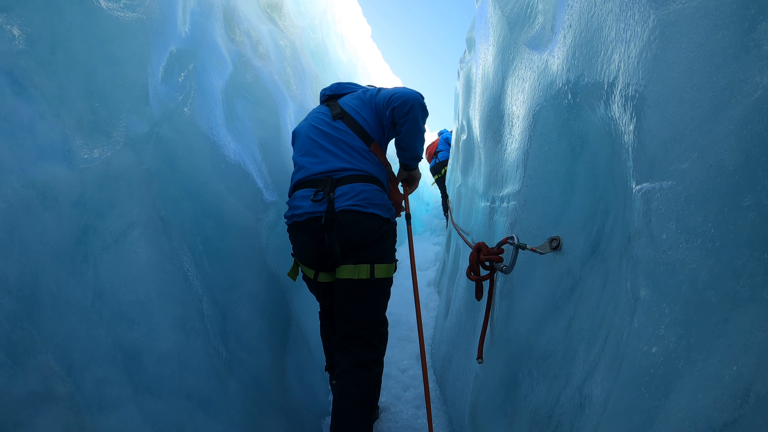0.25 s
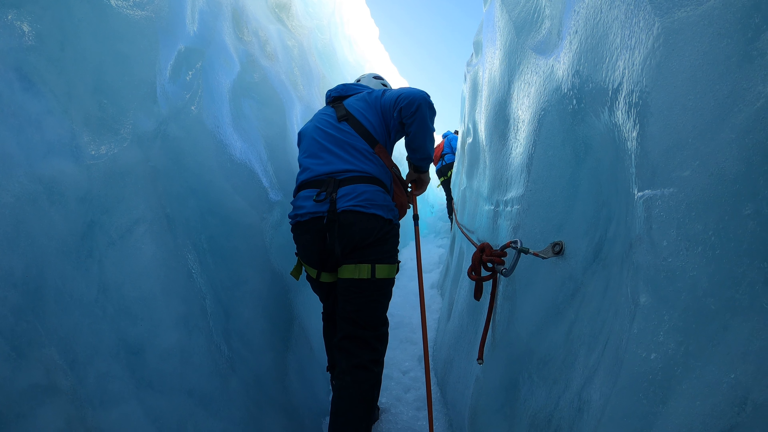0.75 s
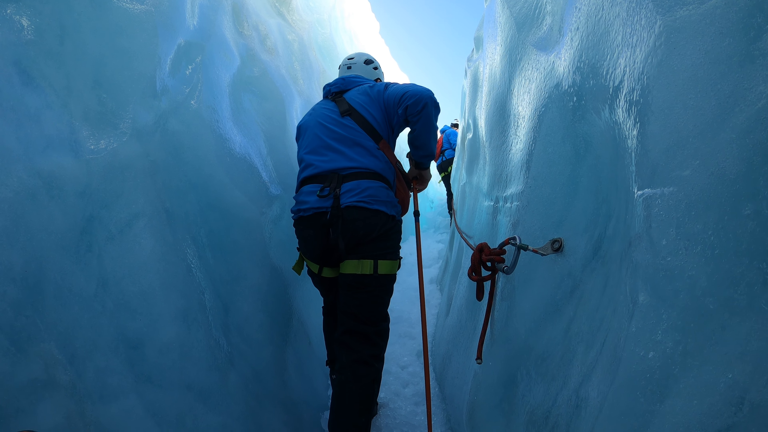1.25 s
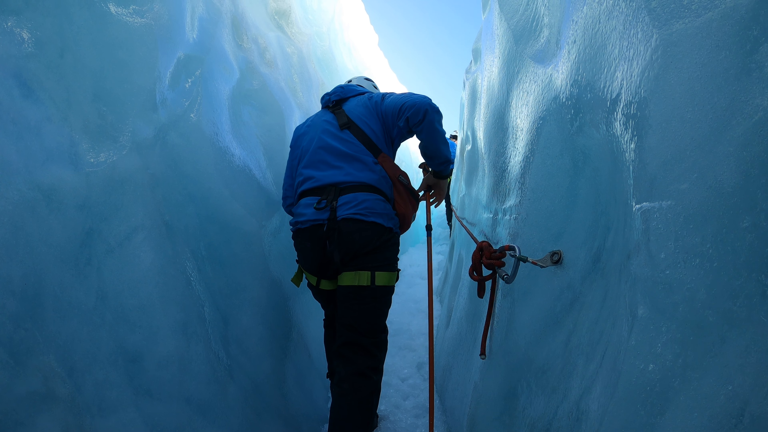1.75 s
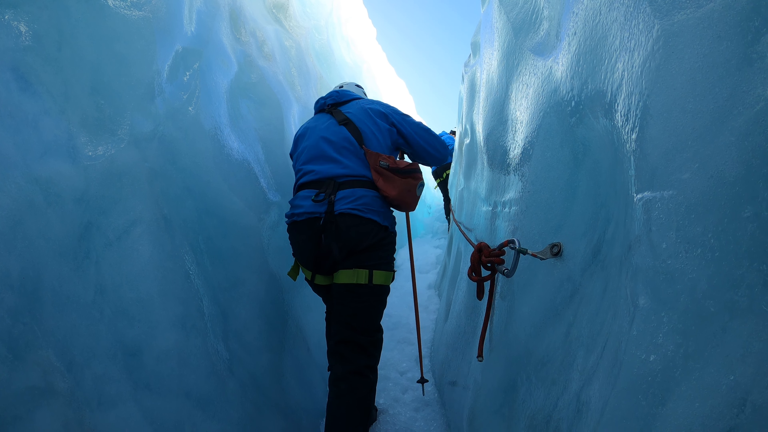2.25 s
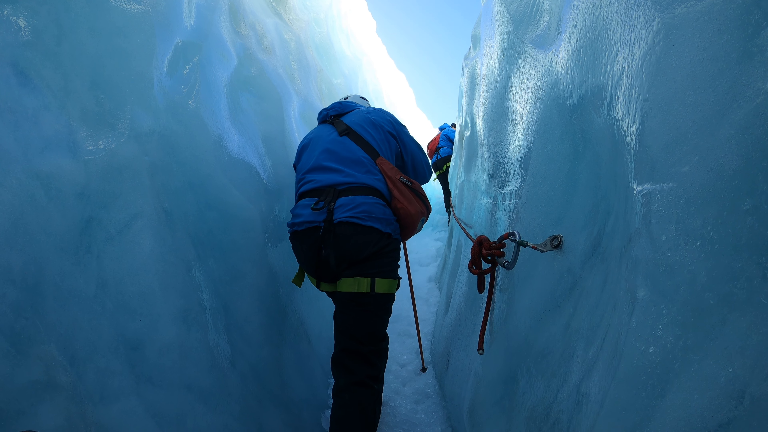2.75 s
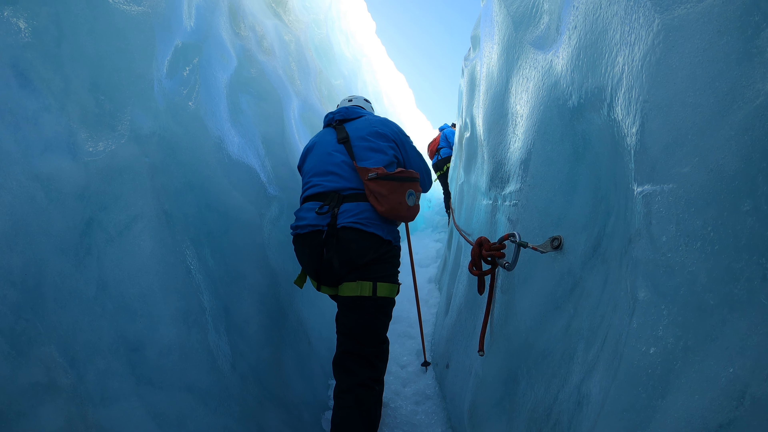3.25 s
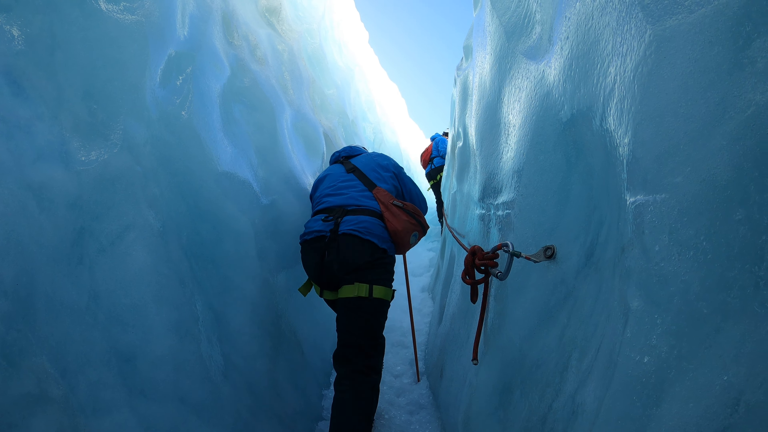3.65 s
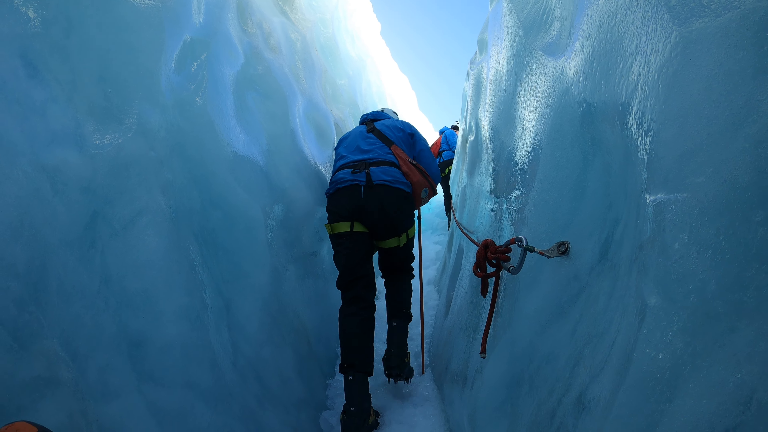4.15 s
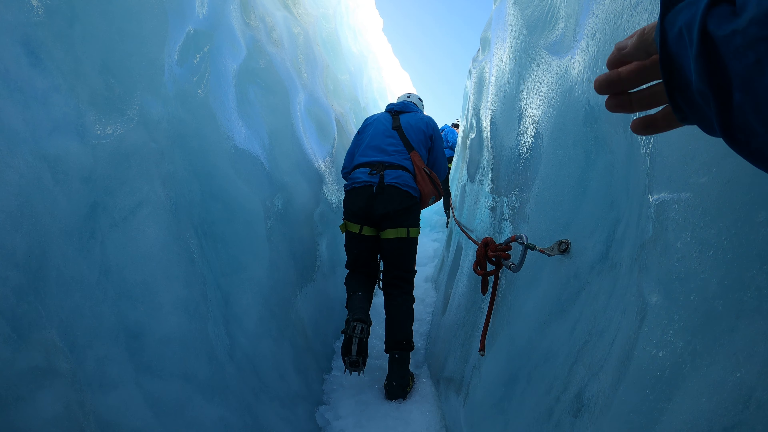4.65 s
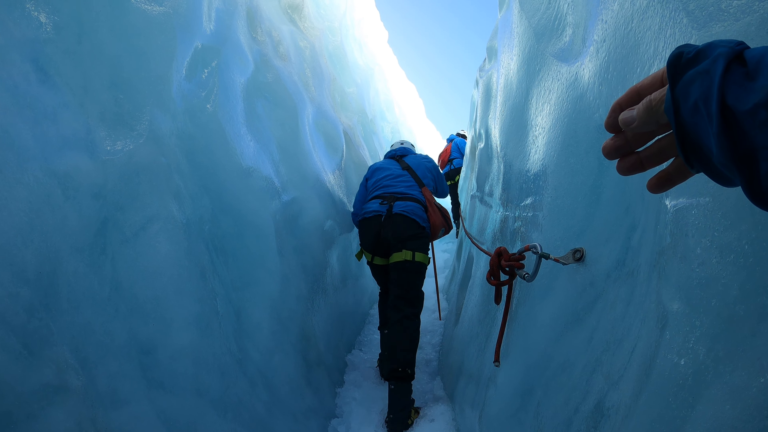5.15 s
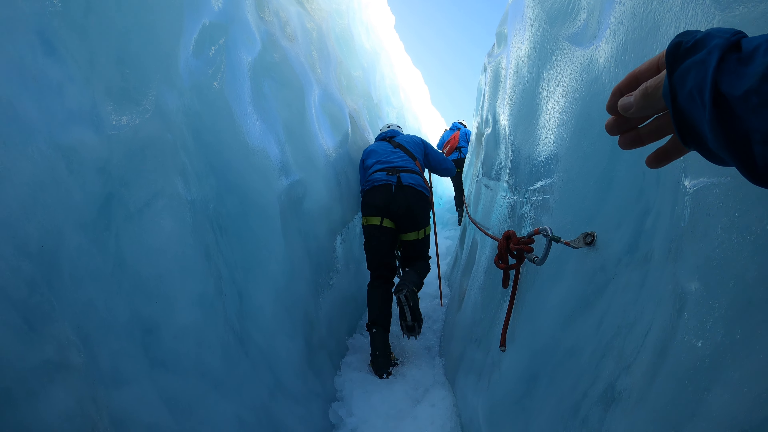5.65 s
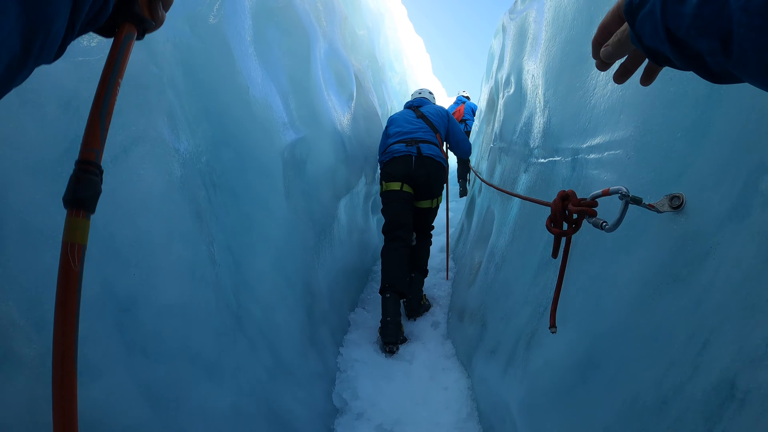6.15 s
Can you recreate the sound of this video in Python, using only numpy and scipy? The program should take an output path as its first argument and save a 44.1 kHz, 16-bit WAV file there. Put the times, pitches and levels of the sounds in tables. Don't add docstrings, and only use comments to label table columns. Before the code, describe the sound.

In a narrow ice passage, a chest-worn microphone first picks up low thumps, fabric rub and a few tiny metal ticks over near silence. A short burst of gritty crunching comes at about two and a half seconds, then a lull with loose chips. From three and a half seconds spiked boots crunch heavily and unevenly, with sharp bites into hard ice, trickling grains, jacket rub and strap rumble to the end.

```python
import sys
import numpy as np
from scipy import signal
from scipy.fft import rfft, irfft, next_fast_len
from scipy.io import wavfile
from scipy.ndimage import uniform_filter1d

SR = 44100
rng = np.random.default_rng(int(sys.argv[2]) if len(sys.argv) > 2 else 0)


def transcribe(u):
    v = np.clip(np.atleast_2d(u).T, -1, 1)
    q = np.round(v * 32767).astype(np.int16)
    wavfile.write(sys.argv[1], SR, q)


def gain_from_decibels(decibels):
    exponent = np.asarray(decibels, float) / 20
    return 10 ** exponent


N = 282328
TIME = np.arange(N) / SR
CONTROL = TIME[::44]
FREQ = np.fft.rfftfreq(next_fast_len(N + SR // 2, True), 1 / SR)
PAD = 2 * len(FREQ) - 2

# [t/s, level/dB, fall by 20 dB/s, brightness/dB]
LANDINGS = [(0.011, -53.5, 0.18, -9.5), (0.53, -59.5, 0.5, -14.5), (1.74, -61, 0.6, -7),
            (2.25, -56.5, 11, -9), (2.357, -40, 0.25, -2), (2.445, -33.5, 0.14, -10.5),
            (2.497, -31.5, 0.1849, -6), (1.39, -51.5, 0.35, -16), (2.76, -58, 0.34, -2.5),
            (3.08, -53.5, 0.24, -34), (3.374, -48, 0.2, -15), (3.442, -30.5, 0.05, -8.5),
            (3.537, -46, 0.04, -7.5), (3.666, -32, 0.06, -7), (3.859, -35.5, 0.1, -7.5),
            (4.08, -42.5, 0.29, -5.5), (4.371, -37, 0.28, -8), (4.44, -37.5, 0.03, -10.5),
            (4.561, -36.5, 0.11, -10), (5.052, -34.5, 0.27, -14), (5.113, -39, 0.48, -4.5),
            (5.547, -31.5, 0.17, -11.5), (5.655, -34, 0.18, -9.5), (5.759, -40, 0.62, -9),
            (6.062, -29.5, 0.06, -8), (6.11, -39.5, 0.22, -6.5), (6.347, -29, -0.12, -8.5),
            (3.451, -37, 0.02, -3), (3.755, -44, 0, -2.5), (3.79, -37.5, 0.02, -6.5), (6.36, -35, -1, -4.5)]
# [end t/s, level/dB, swell/s, brightness/dB]
SCRAPES = [(0.379, -64, 0.14, -4.5), (1.94, -64.5, 0.053, 0), (2.05, -58, 0.17, -7.5),
           (1.571, -48, 0.34, -16.5), (1.699, -47.5, 0.34, -10.5), (2.482, -29, 0.12, -8),
           (2.581, -37, 0.31, -13.5), (2.727, -35.5, 0.09, -9.5), (2.909, -51.5, 0.091, -7.5),
           (3.44, -42, 0.031, -4), (3.66, -37.5, 0.034, -11), (3.78, -36.5, 0.11, -9.5),
           (3.85, -30.5, 0.1, -9.5), (4.08, -38.5, 0.25, -7), (4.37, -44, 0.093, -4), (4.63, -41, .04, -19),
           (5.007, -33.5, 0.39, -9.5), (5.059, -35, 0.067, -10), (5.175, -30.5, 0.26, -11.5),
           (5.643, -30.5, 0.15, -10), (6.055, -43, 0.033, -1), (5.15, -41, .04, -2.5),
           (6.097, -34.5, 0.055, -9.5), (4.505, -47.5, 0.067, -11), (5.98, -50.5, .2, -2.5),
           (6.311, -39, 0.077, -9.5), (6.4, -30, 0.076, -8)]
# [t/s, level/dB]
TRICKLE = [(0, -92), (1.5, -90), (1.6, -63), (1.75, -76), (2.3, -82), (2.4, -51), (2.76, -61),
           (2.95, -70.5), (3.4, -93), (3.7, -69.5), (3.9, -56), (4.3, -60), (4.67, -63.5), (5.0, -58),
           (5.31, -49.5), (5.74, -54), (6.25, -62.5), (6.4, -60)]
# [t/s, peak level/dB, brightness/dB, twice left minus right/dB]
BITES = [(0.926, -64, 12, 8), (0.138, -43, -10, -0.5), (0.2252, -42, -8.5, -3), (.1242, -51, 3, 3),
         (.662, -51.5, 3, 5), (0.865, -50.5, 5, -2), (0.8972, -42, -12.5, 0), (1.366, -52, 4, -4),
         (2.185, -48, 12.5, -11.5), (2.2865, -37.5, 2.5, -6.5), (2.324, -46, 2, 7), (2.357, -29.5, -6, 2.5),
         (2.5125, -27, 2.5, 11), (2.697, -39, 5, 3), (2.713, -32, -5, 6), (2.8834, -48, 4, 3),
         (5.127, -28, -2, 4), (5.294, -42, 2, 2), (2.81, -41, -5, 5), (3.4418, -13.5, -14.5, 1),
         (3.7544, -33, -1.5, 5), (3.7885, -18.5, -13, 6), (3.6637, -24.5, -10.5, 7), (4.06, -33, -12.5, 7),
         (4.123, -31, -5, -8), (4.3312, -29, -6, 2), (4.3622, -21.5, -16, 6), (4.408, -32, 6.5, -1),
         (4.5587, -22, -22, 5), (4.584, -26.5, -12.5, 5), (4.7388, -31, -9, -3), (4.8295, -43, -3, 0),
         (5.12, -24, -6.5, 13), (5.2645, -27, -10, 4), (6.008, -41.5, 6, -3), (6.3455, -10, -7.5, 1)]
# [t/s, peak level/dB, twice left minus right/dB]
BURSTS = [(2.2432, -40.5, -1), (2.416, -39, 0), (2.3769, -27.5, 0), (2.4686, -27, 2), (2.882, -43.5, 5),
          (3.367, -36.5, 16), (3.428, -39, 2), (3.538, -29.5, -3), (3.549, -31, 0), (3.559, -26, 3),
          (3.5801, -30.5, 1.1), (3.652, -29, -2), (3.657, -22, 2), (3.83, -27, 2), (3.8404, -18.5, 8.5),
          (3.9835, -30.5, 9), (4.019, -29, 2), (4.38, -23.5, 3), (4.433, -30, 7), (4.6267, -29, 4),
          (4.8695, -34, 6), (4.899, -36, -1.5), (5.0248, -17, 4), (5.546, -30.5, -4), (5.795, -26, 6),
          (5.981, -38, -1), (6.054, -25, 4), (6.3965, -26, 3), (2.447, -28, 0.5), (2.484, -26, 0),
          (2.54, -30, 0), (4.035, -30, 0), (5.6, -27, 1), (5.65, -27, 0), (3.855, -25.5, 0), (.645, -48, 0)]
# [t/s, peak level/dB, twice left
# minus right/dB]
SNAPS = [(1.987, -43, -1.0), (2.663, -34, 1.5), (2.716, -24, -0.5), (3.753, -32.5, -2), (3.778, -30, 0),
         (3.818, -25, 4), (4.047, -30, -0.5), (4.81, -36.5, 0.0), (4.959, -30, 0.5), (4.994, -29, 1.0),
         (5.045, -28, -1), (5.136, -23, -0.5), (5.152, -28, 6), (5.16, -23.5, 3), (5.183, -28, 2),
         (5.234, -30.5, 0.5), (5.555, -23, 1.5), (5.568, -24.5, 6), (5.636, -26, 1.0), (5.754, -32, 1),
         (5.781, -30, -2.0), (5.835, -31, 1), (5.908, -37, -1), (6.071, -23.5, 1.5), (6.169, -31.5, -1.5),
         (6.31, -33, -2.5), (6.368, -26, 2), (6.374, -28, -1), (6.386, -22.5, 1.0),
         (0.317, -58, -1.5), (0.361, -57, -2.0), (0.619, -46, 0), (0.739, -58, -1.0), (1.049, -53, 0.0),
         (1.149, -59, -1.0), (1.239, -52, 1.5), (1.914, -59, 2), (2.784, -39, 0), (2.824, -42, 0.0),
         (2.866, -41.5, 1.5), (2.902, -39, 1.0), (3.008, -49, 1.0), (3.149, -47.5, -2), (3.26, -49, 1.0),
         (3.636, -35, -0.5), (3.642, -34, 1.0), (3.697, -34, 2.5), (3.713, -30.5, 1.0), (4.501, -36, -3.0),
         (4.602, -32, 0.5), (6.082, -20.5, 1), (6.093, -26, 1.0)]
# [f/Hz, left level/dB, right level/dB, likeness 0-1, phase lead of left/rad]
PORTS = [(380, -100, -100, 0.97, 1), (750, -87, -90, 0.96, 1), (999, -71, -71.5, .97, 0.66),
         (1240, -62, -63, 1, 0.52), (1902, -79, -77.5, 0.34, 0.17), (2125, -78.5, -78.5, 0.98, -2.5),
         (2270, -80.5, -82, 0.7, -2), (2660, -75, -77.5, .55, -2), (3480, -72.5, -73.5, 0, -1.5),
         (3560, -74.5, -76.5, 0.07, 2), (4677, -75, -72.5, 1, -5), (4966, -77.5, -74.5, 0.42, -1.5),
         (7590, -85.5, -102, 0.2, -11.5), (8020, -94.5, -112, .4, -5.5), (8550, -103, -114, 0.5, -13.5),
         (12000, -104, -117, 0.5, -8), (14800, -120, -128, 0.1, -2)]
# [t/s, peak level/dB, f/Hz, t60/s, left minus right/dB]
STEEL_TICKS = [(0.25, -52, 3050, .012, 2), (.59, -72, 9000, .003, 6), (0.1242, -42.5, 4650, 0.011, 5),
               (0.089, -47.5, 3000, 0.013, 5), (.1242, -55, 6500, .008, 6), (.2100, -63, 4800, .01, 4),
               (.2520, -65, 4700, .01, 2), (0.26, -52, 4700, 0.013, 4), (0.2605, -53, 3170, 0.022, 5),
               (0.865, -42.5, 3100, 0.019, 4), (0.864, -56, 5000, 0.012, 7), (1.7850, -76, 7550, 0.13, 23),
               (1.7984, -50, 4500, 0.012, 0.5), (2.188, -48, 5500, 0.032, 2), (2.185, -54, 7240, 0.044, 16),
               (2.2860, -57.5, 7570, 0.061, 23), (4.5323, -50, 4500, .01, 2), (1.9127, -58, 4500, .01, 2),
               (5.47, -48, 6000, .006, 3), (3.023, -51, 5200, 0.018, 1), (4.4069, -34, 4300, 0.032, 3),
               (4.4069, -68, 11900, 0.06, 26), (4.4069, -72, 13600, 0.06, 20),
               (6.3449, -28, 5200, 0.015, 2), (6.3968, -24, 3680, .015, 5), (6.3452, -24, 2600, 0.02, 10),
               (6.345, -32, 4700, .02, 4), (6.347, -37, 2900, 0.018, 6)]
# [t/s, peak level/dB, f/Hz, t60/s]
THUMPS = [(0.1176, -20, 76, 0.12), (0.5832, -13, 69, 0.054), (1.056, -27, 48.8, 0.28),
          (1.503, -20, 72, 0.13), (1.9751, -18.5, 66, 0.088), (2.43, -16.5, 64, 0.052),
          (2.741, -40.5, 177, 0.19), (2.887, -29.5, 78, 0.11), (3.3541, -19, 77, 0.073),
          (3.804, -28.5, 79.5, 0.23), (4.0926, -23, 99.5, 0.19), (4.1333, -13.5, 92, 0.046),
          (4.573, -26, 108, 0.24), (4.741, -25, 70, 0.05), (4.781, -21, 46, .09), (5.2491, -17, 52, 0.087),
          (5.6762, -16.5, 68, 0.077), (6.1737, -22, 48.3, 0.14)]
# [t/s, rub level/dB, rumble level/dB, rise by 20 dB/s, fall by 20 dB/s]
ARM_PULLS = [(0.0, -54.5, -40, .1, 0.3), (.62, -62, -42, 0.39, 0.3), (.77, -66, -57.5, 0.057, 1.1),
             (1.3, -73, -46.5, 0.51, 1.1), (1.42, -48.5, -40.5, 0.08, 0.13), (1.55, -48.5, -58, 0.082, .2),
             (1.6, -47.5, -51, 0.23, 0.08), (1.71, -55.5, -61, 0.093, 0.11),
             (2.361, -46.5, -58, 0.018, 0.48), (2.528, -39, -40, 0.15, 0.08), (2.74, -70, -64, 0.13, 0.3),
             (3.37, -58.5, -39.5, 0.037, 0.48), (3.8, -39.5, -40.5, 0.082, 0.2),
             (3.99, -53, -30, 0.087, 0.4), (4.08, -37.5, -34, 0.11, 0.19), (4.13, -40.5, -29, 0.22, 0.1),
             (4.35, -43.5, -40.5, 0.066, 0.13), (4.601, -42.5, -31, 0.19, 0.1),
             (4.77, -48, -36.5, 0.059, 0.2), (5.1, -43, -34.5, 0.55, 0.16),
             (5.199, -47.5, -40.5, 0.15, 0.12), (5.554, -45, -47, 0.019, 0.2),
             (5.61, -42, -36.5, 0.057, 0.2), (5.792, -35, -30.5, 0.047, 0.02), (5.92, -53, -32.5, 0.13, 1),
             (6.129, -37, -34, 0.36, 0.14), (6.35, -39, -32, 0.17, 13)]
# [t/s, level/dB]
LEANS = [(0, -34.5), (.14, -27.5), (.58, -36.5), (.71, -39), (1.16, -40.5), (1.58, -35.5), (1.68, -42),
         (1.99, -30), (2.07, -34.5), (2.441, -29.5), (2.91, -36), (3.3, -47), (3.5, -40.5), (3.69, -44.5),
         (3.9, -30.5), (4.08, -27.5), (4.31, -39), (4.53, -44), (4.74, -31), (5.261, -31), (5.5, -45),
         (5.62, -43.5), (5.79, -40), (5.92, -31), (6.198, -29.5), (6.35, -29)]
# [f/Hz, density/dB per Hz]
SWAY_SPECTRUM = [(10, -18), (20, 3.5), (38, -5), (60, -20), (120, -76), (400, -140)]
# [f/Hz, density/dB per Hz]
RUMBLE_SPECTRUM = [(22, -23.5), (48, -3.5), (100, -2), (140, -7.5), (200, -15), (270, -33.5), (440, -100),
                   (2000, -140)]
# [f/Hz, density/dB per Hz]
RUB_SPECTRUM = [(76, -30), (130, -5), (161, -1), (460, -12.5), (509, -12.5), (569, -16), (1000, -17),
                (1500, -39), (2200, -120)]
# [f/Hz, density/dB per Hz]
LOOSE_SPECTRUM = [(76, -45), (200, -12.5), (500, -8.5), (1000, -14), (1500, -38), (2200, -120)]


def ice():
    hush, hush_s = 0.41, 0.0046
    slip_gap = 36
    low_db, bright_db, sparkle_db = crunch()
    sparkle_db = sparkle_db - 0.68 * np.clip(-55 - low_db, 0, None)
    relative_db = 0 * low_db, bright_db + 2.5, sparkle_db + 5
    powder = 1.0, 1.2, 2.2
    flutter_db = 1.5, 0.8, 0.6
    grit = np.zeros((3, 2, N))
    strike = np.zeros((3, 2, N))
    clumps_db = walk(40)
    for k in range(3):
        broken = level(grains(2500, spread_db=2), 0)
        crushed = level(broken + powder[k], 0)
        grit[k] = crushed * gain_from_decibels(low_db + relative_db[k] + clumps_db + flutter_db[k] * walk(70))
    for s, peak_db, rel_db, t60, pan_db in cracks():
        dull = rel_db < -11.5
        start = int(s * SR)
        age = TIME[:min(SR // 10, N - start)]
        register_db = np.array([0, rel_db, rel_db - 22.5])[:, None]
        size = gain_from_decibels(peak_db + register_db + np.array([pan_db, -pan_db]) / 4)
        grit[:, :, start - 800:start] *= 1 - hush * np.exp(-TIME[800:0:-1] / hush_s)
        strike[1:, :, start] += size[1:] * gain_from_decibels(-1.5 - 2 * dull)
        slips = np.array((0.38, 0.55, 0.55) if dull else (1,))
        strike[0, :, start:start + len(slips) * slip_gap:slip_gap] += size[0][:, None] * gain_from_decibels(-3.5) * slips
        tail = gain_from_decibels(-15) * decay(age, t60)
        grit[:, :, start:start + len(age)] += size[:, :, None] * tail
    return ports(grit, strike)


def crunch():
    far_db = np.array([-64.5, -75, -110])[:, None]
    powder_db = np.array([0, 0, -14])[:, None]
    s, trickle_db = np.transpose(TRICKLE)
    power = gain_from_decibels(2 * far_db) + gain_from_decibels(2 * (np.interp(CONTROL, s, trickle_db) + powder_db))
    for s, db, fall_s, bright_db in LANDINGS:
        power = power + registers(db, bright_db) * slopes(s, 0.016, fall_s)
    for s, db, swell_s, bright_db in SCRAPES:
        swell = np.clip(1 + (CONTROL - s) / swell_s, 0, 1) ** (2 * 1.33)
        power = power + registers(db, bright_db) * swell * slopes(s, np.inf, 0.034)
    low_db, bright_db, sparkle_db = to_db(power)
    return low_db, bright_db - low_db, sparkle_db - low_db


def registers(db, bright_db):
    sparkle_db = -22.5 + 1.5 * bright_db
    return gain_from_decibels(2 * (db + np.array([[0], [bright_db], [sparkle_db]])))


def cracks():
    bursts = [(s, db, -20, 0.041, pan_db) for s, db, pan_db in BURSTS]
    snaps = [(s, db, -12, 0.014, pan_db) for s, db, pan_db in SNAPS]
    bites = [(s, db, bright_db, 0.094, pan_db) for s, db, bright_db, pan_db in BITES]
    return bursts + snaps + bites


def grains(per_s, spread_db):
    breaks = rng.random(N) < per_s / SR
    return breaks * gain_from_decibels(spread_db * np.minimum(rng.exponential(size=N), 3.5))


def shards(count=22):
    pitches = np.geomspace(2100, 13000, count) * (1 + 0.015 * rng.standard_normal(count))
    lump_pitches = 890, 960, 1077, 1240, 1396, 1610, 1704
    splinters = sum(resonate(grains(70, spread_db=1.66), hz, 190) for hz in pitches)
    lumps = sum(resonate(grains(70, spread_db=1.2), hz, 130) for hz in lump_pitches)
    return level(rng.standard_normal(N) + level(splinters, -4) + level(lumps, -19), 0)


def ports(grit, strike):
    slot_hz, slot_width_hz, slot_db = 2960, 320, 7.5
    wall_lag = 37
    below = [1 / (1 + (FREQ / hz) ** 12) for hz in (2000, 8000)]
    bands = below[0], below[1] - below[0], 1 - below[1]
    slot = slot_db / (1 + (2 * (FREQ - slot_hz) / slot_width_hz) ** 2)
    left = causal(along(PORTS, 1) + slot)
    right = causal(along(PORTS, 2))
    like = np.clip(along(PORTS, 3), 0, 1)
    turn = np.exp(1j * (np.angle(left) - np.angle(right) - along(PORTS, 4)))
    near, other = shards(), shards()
    out = 0
    for size, blow, band in zip(grit, strike, bands):
        norm = band / np.sqrt(np.mean(np.abs(band * left) ** 2))
        blow = blow / np.abs(irfft(left * norm, PAD)).max()
        heard_left = rfft(size[0] * near + blow[0], PAD) * left
        same = rfft(size[1] * near + blow[1], PAD)
        unlike = rfft(size[1] * other + np.roll(blow[1], wall_lag), PAD)
        heard_right = (like * turn * same + np.sqrt(1 - like ** 2) * unlike) * right
        out = out + irfft(np.array([heard_left, heard_right]) * norm, PAD)[:, :N]
    return out


def steel():
    out = np.zeros((2, N))
    for s, peak_db, hz, t60, pan_db in STEEL_TICKS:
        modes = ring(hz, t60, rise_s=0.00099) + 0.4 * ring(1.03 * hz, t60, rise_s=0.00054)
        contact = 1.9 * ring(min(0.31 * hz, 4500), 0.0015, rise_s=0.0001)
        add(out, (modes + contact) * gain_from_decibels(peak_db + np.array([[pan_db], [-pan_db]]) / 2), s)
    return out


def thumps():
    out = -gain_from_decibels(-37.5) * np.cos(2 * np.pi * 16 * TIME) * np.exp(-TIME / 0.04)
    for s, peak_db, hz, t60 in THUMPS:
        wobble = 0.14 * ring(30.5, 0.77, rise_s=0.099)
        add(out, gain_from_decibels(peak_db + 1) * (ring(hz, t60, rise_s=0.4 / hz) - wobble), s)
    return out


def knock():
    start_hz, end_hz, glide_s = 300, 84, 0.003
    age = TIME[:SR // 4]
    hz = end_hz + (start_hz - end_hz) * np.exp(-age / glide_s)
    wave = np.sin(2 * np.pi * np.cumsum(hz) / SR) * decay(age, 0.09)
    out = np.zeros(N)
    add(out, gain_from_decibels(-15 - 2) * wave, 5.798)
    return out


def mount():
    sway_db, rumble_db, rub_db = motion()
    sway = coloured(rng.standard_normal(N) * gain_from_decibels(sway_db), SWAY_SPECTRUM)
    jolts = level((grains(400, spread_db=2) + 0.06) * rng.standard_normal(N), 0)
    rumble = coloured(jolts * gain_from_decibels(rumble_db - 3), RUMBLE_SPECTRUM)
    fibres = level((grains(900, spread_db=1.5) + 0.081) * rng.standard_normal(N), 0)
    rub = coloured(fibres * gain_from_decibels(rub_db + 2 + 2 * walk(30)), RUB_SPECTRUM)
    loose = coloured(rng.standard_normal(N) * gain_from_decibels(rub_db - 13), LOOSE_SPECTRUM)
    loose += coloured(rng.standard_normal(N) * gain_from_decibels(rumble_db - 24), RUMBLE_SPECTRUM)
    loose += coloured(rng.standard_normal(N) * gain_from_decibels(sway_db - 16), SWAY_SPECTRUM)
    return sway + rumble + rub + drone() + loose * np.array([[1], [-1]])


def motion():
    sway, rumble, rub = gain_from_decibels(2 * np.array([-50.5, -59.5, -73.5]))
    for s, db in LEANS:
        sway = sway + gain_from_decibels(2 * db) * slopes(s, 0.15, 0.15)
    for s, peak_db, _, _ in THUMPS:
        rumble = rumble + gain_from_decibels(2 * (peak_db - 19)) * slopes(s + 0.011, 0.055, 0.091)
    for s, rub_db, rumble_db, rise_s, fall_s in ARM_PULLS:
        pull = slopes(s, rise_s, fall_s)
        rub = rub + gain_from_decibels(2 * rub_db) * pull
        rumble = rumble + gain_from_decibels(2 * rumble_db) * pull
    return to_db([sway, rumble, rub])


def drone():
    hz, width_hz = 203, 35.6
    air = rng.standard_normal(N)
    hollow = resonate(resonate(air, hz, width_hz), hz, width_hz)
    return level(hollow, -63) * gain_from_decibels(walk(14))


def level(x, db):
    return x * gain_from_decibels(db) / np.sqrt(np.mean(x ** 2))


def decay(age, t60):
    return np.exp(-np.log(1000) * age / t60)


def ring(hz, t60, rise_s):
    age = TIME[:SR // 2]
    return np.sin(2 * np.pi * hz * age) * decay(age, t60) * (1 - np.exp(-age / rise_s))


def resonate(x, hz, width_hz):
    return signal.lfilter(*signal.iirpeak(hz, hz / width_hz, fs=SR), x)


def slopes(s, rise_s, fall_s):
    age = CONTROL - s
    return gain_from_decibels(-40 * np.where(age < 0, -age / max(rise_s, 0.003), age / max(fall_s, 0.003)))


def walk(rate):
    k = int(SR / rate)
    held = np.repeat(rng.standard_normal(N // k + 1), k)
    return 0.58 * uniform_filter1d(held, k)[:N]


def to_db(powers):
    return [np.interp(TIME, CONTROL, 10 * np.log10(p)) for p in powers]


def along(table, column):
    rows = np.array(table)
    return np.interp(np.log(FREQ + 1), np.log(rows[:, 0]), rows[:, column])


def causal(db):
    cepstrum = irfft(db * np.log(10) / 20, PAD)
    cepstrum[1:PAD // 2] *= 2
    cepstrum[PAD // 2 + 1:] = 0
    return np.exp(rfft(cepstrum))


def coloured(excite, shape):
    response = causal(along(shape, 1))
    return irfft(rfft(excite, PAD) * response, PAD)[:N] / np.sqrt(np.mean(np.abs(response) ** 2))


def add(out, sound, s):
    start = int(s * SR)
    out[..., start:start + sound.shape[-1]] += sound[..., :N - start]


def scene():
    port_lag = 4
    left, right = (mount() + thumps() + knock()) * gain_from_decibels(np.array([[0.35], [-0.35]]))
    body = np.array([left, np.pad(right, (port_lag, 0), "edge")[:N]])
    return ice() + steel() + body


def band_limit(x):
    return signal.sosfilt(signal.butter(12, 15700, fs=SR, output="sos"), x)


def record(dry):
    hiss = gain_from_decibels(-122) * rng.standard_normal(dry.shape)
    return band_limit(dry + hiss)


dry = scene()
out = record(dry)
transcribe(out)
```